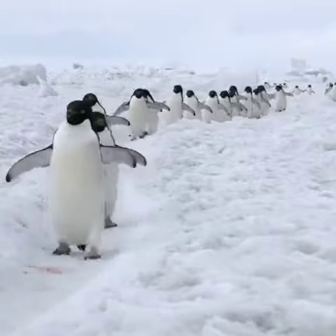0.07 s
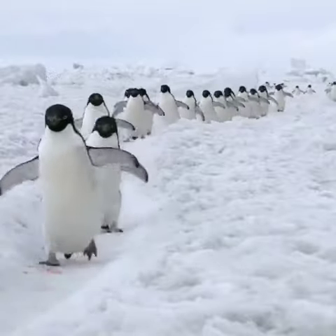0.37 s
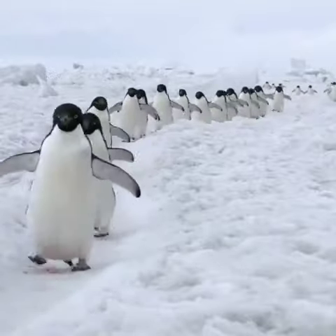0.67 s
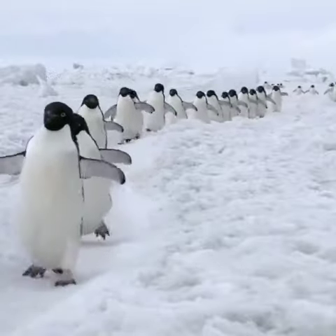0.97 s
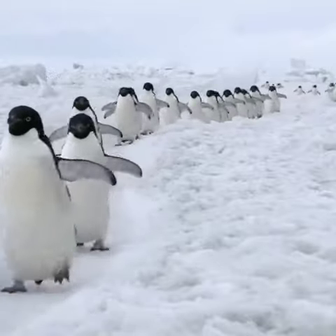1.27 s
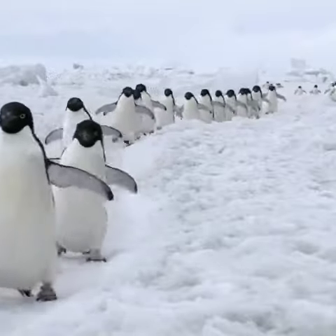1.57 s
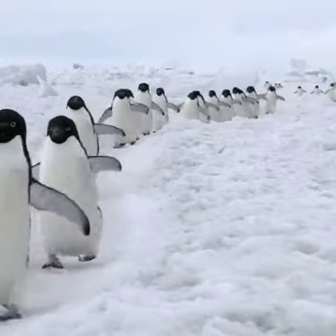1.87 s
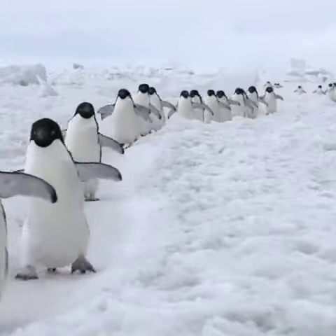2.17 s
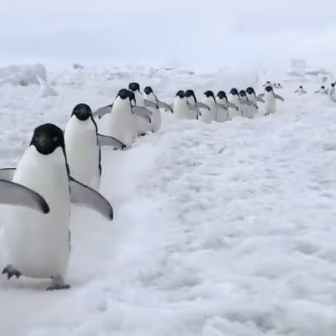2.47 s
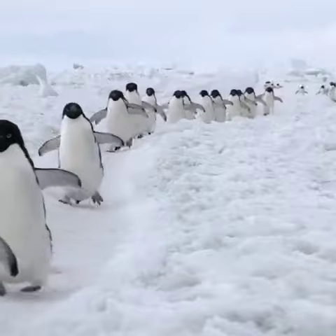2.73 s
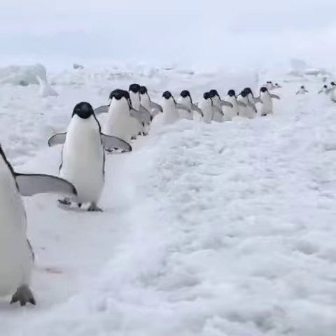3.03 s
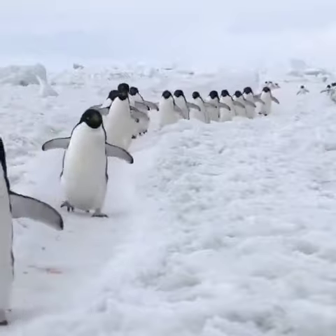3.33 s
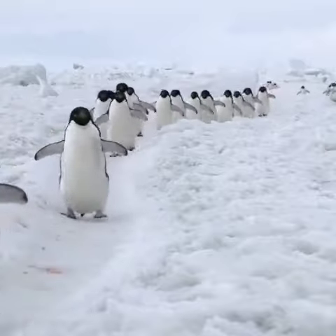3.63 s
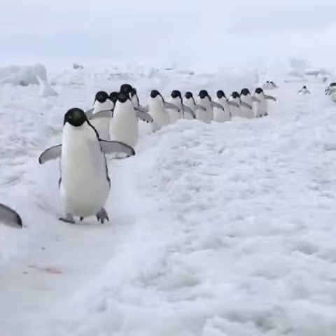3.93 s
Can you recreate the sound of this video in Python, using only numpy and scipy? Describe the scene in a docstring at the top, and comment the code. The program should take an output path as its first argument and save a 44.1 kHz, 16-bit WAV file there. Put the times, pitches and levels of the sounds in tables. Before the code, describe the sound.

One brief, raspy penguin squawk sounds early on, outdoors, over the faint crunching and shuffling of penguins walking on snow. The steps carry on as a gust of wind rumbles against the microphone with dull thumps and dies down.

```python
"""Penguins waddle over crusted snow in light wind. From the start their feet crunch and snap the
crust by brittle fracture, while more feet shuffle further back. At 0.6 s one bird gives a short
harsh squawk, pulses from its syrinx filtered by throat and bill, which arches in pitch and ends in
a rattle. The steps go on, and from 2.4 s the wind's turbulence swells to a rumble that buffets the
microphone with dull thumps, peaks near 3 s and eases."""
import sys
import numpy as np
from scipy import signal
from scipy.fft import rfft, irfft
from scipy.io import wavfile

SR = 44100
rng = np.random.default_rng(int(sys.argv[2]) if len(sys.argv) > 2 else 0)


def bounce(signal):
    """Save signal as a 16-bit WAV file at the path given by the first command-line argument."""
    frames = np.transpose(np.atleast_2d(signal))
    limited = np.clip(frames, -1, 1)
    pcm = np.round(limited * 32767).astype(np.int16)
    wavfile.write(sys.argv[1], SR, pcm)


N = 176400


# course of the call: t/s, pitch f/Hz, source level/dB, roughness (0 to 1)
CALL = [(.621, 165.6, -38, 0.35), (.632, 174, -34, 0.3), (.646, 186.4, -29, 0.15),
        (.664, 199.5, -26.5, 0.03), (.699, 206, -27.5, 0.03), (.711, 205, -28.5, 0.22),
        (.725, 200.4, -28.5, 0.3), (.742, 172, -29.5, 0.24), (.762, 174.4, -30, 0.28),
        (.777, 130.7, -32.5, 0.35), (.786, 124.4, -47, 0.35)]

def squawk():
    """Source-filter principle: pulses and rasping breath from the syrinx excite the bill and throat."""
    t = np.arange(CALL[0][0], CALL[-1][0], 1 / SR)
    hz, db, roughness = curve(CALL, t)
    cycles = np.cumsum(hz) / SR
    source = (syrinx(t, cycles, roughness) + rasp(cycles, roughness)) * amp(db)
    call = np.zeros(N)
    add(call, t[0], bill(source, hz))
    return throat(call)


def syrinx(t, cycles, roughness):
    """Self-sustained oscillation: both sides snap once a cycle; jitter and shimmer make it rough."""
    jitter_s, shimmer_db = 0.00027, 6.5  # at full roughness
    second_jitter_s, second_shimmer_db = 0.00028, 18.5  # likewise
    second_lead_s, second_db = 0.001236, -6.5  # the second side is early and weaker
    onsets = np.flatnonzero(np.diff(np.floor(cycles)))
    pulses = np.zeros(len(t))
    for i, (late, size, lead, second_size) in zip(onsets, rng.standard_normal((64, 4))):
        rough = roughness[i]
        at = t[i] + jitter_s * rough * late
        early = at - second_lead_s - second_jitter_s * rough * lead
        pulses += amp(shimmer_db * rough * size) * np.sinc((t - at) * SR)
        pulses += amp(second_db + second_shimmer_db * rough * second_size) * np.sinc((t - early) * SR)
    return unit(pulses)


def rasp(cycles, roughness):
    """Modulated flow noise: one decaying puff of breath a cycle, stronger when the voice is rough."""
    puffs = unit(np.exp(-(cycles % 1) / .5) * rng.standard_normal(N)[:len(cycles)])
    breath = colour(puffs, [(200, -14), (700, 0), (2000, 0), (6000, -3)])
    return breath * amp(-7) * (.05 + roughness)


# resonances of the open bill: f/Hz, bandwidth/Hz, gain/dB
BILL_FORMANTS = [(620, 240, 3), (1376, 51, -2)]
# nasal resonances at full strength: f/Hz, bandwidth/Hz, gain/dB
NASAL_FORMANTS = [(1245, 54, 6), (2080, 210, -8)]

def bill(source, hz):
    """Cavity resonance: formants rise as the bill opens with pitch; nasal ones emerge as it closes."""
    open_hz, full_nasal_closure = 199, 0.049
    opening = (hz / open_hz) ** 0.9
    closing = np.clip((1 - opening) / full_nasal_closure, 0, 1)
    oral = sum(amp(db) * resonate(source, f * opening, width) for f, width, db in BILL_FORMANTS)
    nasal = sum(amp(db) * resonate(source * closing, np.full(len(hz), f), width)
                for f, width, db in NASAL_FORMANTS)
    return source + oral + nasal


# band in which the throat answers late: f/Hz, bandwidth/Hz
THROAT_LAG = [(1200, 2700)]
# steady response of throat and bill: f/Hz, relative gain/dB
THROAT_RESPONSE = [(60, -53), (130, 1.5), (195, 5.5), (290, 1.5), (410, -3), (590, -1), (800, -4.5),
                   (1130, 1.5), (1370, -0.5), (1600, -13.5), (2050, 3.5), (2400, -11), (2800, -1),
                   (3600, -16.5), (4000, -10), (4850, -12), (5600, -21.5), (6500, -20.5), (8500, -32.5),
                   (12000, -27), (13500, -45)]

def throat(x):
    """Group delay and formants: an all-pass stage smears each pulse, then steady peaks colour it."""
    for centre, width in THROAT_LAG:
        r = np.exp(-np.pi * width / SR)
        poles = [1, -2 * r * np.cos(2 * np.pi * centre / SR), r * r]
        x = signal.lfilter(poles[::-1], poles, x)
    return colour(x, THROAT_RESPONSE)


# paths off the snow and nearby birds: delay t/s, gain/dB
REFLECTIONS = [(.00215, -21), (.0033, -23), (.0047, -23), (.0074, -8.5)]

def echoed(x):
    """Early reflection: delayed copies with little bass add to the direct sound."""
    bright = signal.sosfilt(signal.butter(1, 1500, "high", fs=SR, output="sos"), x)
    out = x.copy()
    for delay, db in REFLECTIONS:
        add(out, delay, amp(db) * bright)
    return out


# spectra of snow packing down and of fine powder: f/Hz, relative level/dB
PACKING_SPECTRUM = [(100, -4.5), (300, 2), (450, -5.5), (650, -3.5), (900, -5.5), (1300, -8), (2500, -7.5),
                    (6000, -58)]
POWDER_SPECTRUM = [(1500, -65), (4000, -10.5), (6000, 9), (9000, 9), (12300, 10.5), (13500, -18.5)]
# footfalls: t/s, duration/s, level/dB, crunch f/Hz, relative packing level/dB, relative powder level/dB
FOOTFALLS = [(0.015, 0.07, -42.5, 3000, -10.5, -12), (0.088, 0.016, -41.5, 3760, -3, -6),
             (0.114, 0.015, -44.5, 2640, -23, -4), (0.146, 0.076, -49, 3340, -7.5, -32),
             (0.222, 0.06, -47, 2770, -11, -28), (0.258, 0.012, -42.5, 3200, -9, -14),
             (0.352, 0.033, -52, 3100, -1, -4), (0.414, 0.12, -48, 4100, -6, -20),
             (0.534, 0.033, -44.5, 3580, -8.5, -13), (0.842, 0.041, -47.5, 3400, -7, -15),
             (0.965, 0.065, -46.5, 4060, -6, -5.5), (0.986, 0.0086, -39, 4430, -32, -21),
             (1.039, 0.039, -47, 3220, -4.5, -11), (1.228, 0.051, -47, 2940, -6.5, -17),
             (1.352, 0.043, -50, 3550, -5, -10), (1.451, 0.096, -47.5, 3130, -8, -17),
             (1.55, 0.042, -44.5, 3540, -8.5, -8), (1.616, 0.074, -50.5, 2870, -3.5, -6),
             (1.81, 0.12, -49, 3480, -10.5, -7), (1.961, 0.14, -47, 3130, -27, -7),
             (2.021, 0.024, -45, 2850, 3.5, -8), (2.268, 0.064, -50, 3100, -14, -11),
             (2.336, 0.1, -52, 2920, -6, -4), (2.551, 0.017, -45.5, 3000, 0.5, -26),
             (2.561, 0.069, -51, 3300, -9, -2.5), (2.654, 0.046, -47, 2890, -14, -13),
             (2.852, 0.042, -53, 3280, -8, 1), (3.08, 0.029, -50.5, 3100, 0, -2.5),
             (3.103, 0.032, -43.5, 3000, -2.5, -7.5), (3.306, 0.1, -53, 4500, -9, -17),
             (3.59, 0.025, -46.5, 4330, -16, -4), (3.613, 0.048, -52.5, 3700, 3, -9),
             (3.823, 0.097, -53, 4000, 0, 0)]

def steps():
    """Granular fracture: each foot crushes brittle crust, with dull packing beneath and powder on top."""
    rise, fall = 0.22, 0.59  # shares of a step
    crunch, packing_level, powder_level = np.zeros((3, N))
    clumps = unit(amp(3.05 * drift(rate_hz=284)))
    fractures = clumps * grains(per_s=5000, spread_db=5)
    for start, length, db, hz, packing_db, powder_db in FOOTFALLS:
        progress = np.linspace(0, 1, round(length * SR))
        press = amp(db) * np.clip(np.minimum(progress / rise, (1 - progress) / fall), 0, 1)
        crushed = press * unit(np.roll(fractures, -round(start * SR))[:len(press)])
        add(crunch, start, crust(np.pad(crushed, (0, SR // 100)), hz))
        add(packing_level, start, press * amp(packing_db))
        add(powder_level, start, press * amp(powder_db))
    powder = [colour(powder_level * clumps * grains(per_s=14000, spread_db=6.5), POWDER_SPECTRUM)
              for _ in range(2)]
    packing = colour(packing_level * clumps * rng.standard_normal(N), PACKING_SPECTRUM)
    return crunch + packing + stereo(*powder)


# single breaks of the crust: t/s, relative level/dB, f/Hz, treble level/dB relative to the body
BREAKS = [(0.012, -36.5, 3100, -7), (0.0943, -42, 3400, -15), (0.1537, -39, 3620, -20),
          (0.2616, -36, 3180, -36), (.3985, -41, 2850, -24), (.4205, -40, 3430, -6.5),
          (.487, -37.5, 3870, -17), (.913, -41.5, 3520, -3.5), (1.054, -39, 3330, -14),
          (1.214, -39, 3050, -13), (1.264, -37.5, 4350, -9), (1.74, -39.5, 3800, -5.5),
          (1.8568, -36, 3500, -10), (1.9358, -42, 3480, -5), (1.9718, -32, 3520, -9),
          (2.0238, -41, 3000, -14), (2.105, -48, 3270, -27.5), (2.26, -45, 3800, -13),
          (2.334, -38.5, 3140, -24), (2.426, -41, 2930, -23), (2.4335, -39, 2710, -24),
          (2.5579, -38.5, 2980, -2.5), (2.6584, -35, 2800, -15), (2.9118, -41.5, 3580, -6),
          (2.9757, -38, 3300, -22), (3.1445, -35.5, 3100, -9), (3.349, -41.5, 4000, -1),
          (3.554, -46.5, 4600, 3), (3.585, -42, 3060, -10), (3.701, -48, 2490, -8), (3.749, -46, 4250, -9),
          (3.834, -44.5, 4000, 5), (3.8608, -45, 3770, -8), (3.96, -41, 3970, -10)]

def snaps():
    """Impulsive excitation: a piece of crust gives way in one crack, followed by a few crumbs."""
    t = np.arange(round(.01 * SR)) / SR
    crumbs_db, decay_s = -18.5, 0.0019
    body, treble = np.zeros((2, N))
    for start, db, hz, treble_db in BREAKS:
        crumbs = amp(crumbs_db) * rng.standard_normal((2, len(t))) * np.exp(-t / decay_s)
        body_hit, treble_hit = (t == 0) + crumbs
        gain = amp(db - 8)
        add(body, start, gain * unit(crust(body_hit, hz)))
        add(treble, start, gain * amp(treble_db) * unit(treble_hit))
    return body + colour(treble, POWDER_SPECTRUM)


# spectrum of crust breaking at the reference pitch: f/Hz, relative level/dB
CRUST_SPECTRUM = [(300, -13), (1200, -10), (2100, -8), (2900, 2.5), (3300, 3), (4200, -3), (5500, -10.5),
                  (8000, -22), (13500, -14)]

def crust(x, hz, reference_hz=3100):
    """Frequency scaling: smaller pieces of crust sound the same spectrum at a higher pitch."""
    return colour(x, [(f * hz / reference_hz, db) for f, db in CRUST_SPECTRUM])


# spectra of the wind's low rumble and upper flutter: f/Hz, relative level/dB
RUMBLE_SPECTRUM = [(18, -26), (30, -39), (55, -9), (90, 0), (125, 2), (170, -4), (250, -20.5), (420, -30),
                   (900, -61.5)]
FLUTTER_SPECTRUM = [(60, -22), (130, -1), (190, 0), (260, -7), (380, -19.5), (600, -27.5), (1500, -45.5)]
# their envelopes: t/s, relative level/dB
RUMBLE_ENVELOPE = [(0, -52), (.24, -38.5), (.36, -47), (.8, -43.5), (1.1, -48.5), (1.2, -44), (1.58, -43.5),
                   (1.69, -54.5), (1.82, -62), (1.88, -43), (2.1, -49), (2.22, -47), (2.48, -36.5),
                   (2.7, -38), (2.94, -40), (3.0, -29.5), (3.06, -37.5), (3.12, -30.5), (3.2, -39),
                   (3.42, -39.5), (3.62, -45.5), (3.73, -49), (3.77, -39), (3.86, -47.5), (4, -45.5)]
FLUTTER_ENVELOPE = [(0, -36.5), (.24, -45.5), (.55, -52.5), (1.3, -66), (1.8, -89), (2.2, -60.5),
                    (2.5, -52), (2.93, -48), (2.99, -45), (3.06, -39.5), (3.12, -40.5), (3.22, -48),
                    (3.55, -55), (4, -89)]

def wind():
    """Turbulence: lumpy pressure fluctuations on the microphone make two bands of low noise."""
    t = np.arange(N) / SR
    rumble = colour(rng.standard_normal(N), RUMBLE_SPECTRUM) * amp(curve(RUMBLE_ENVELOPE, t)[0] - 2.5)
    flutter = colour(rng.standard_normal(N), FLUTTER_SPECTRUM) * amp(curve(FLUTTER_ENVELOPE, t)[0] + 1.5)
    eddies = unit(amp(1.8 * drift(rate_hz=27)))
    return (rumble + flutter) * eddies


# spectrum of a puff of air: f/Hz, relative level/dB
PUFF_SPECTRUM = [(100, -15.5), (250, 10.5), (420, 3), (700, -11.5), (2000, -52), (6000, -42)]
# buffets of wind: t/s, f/Hz, peak level/dB of the tone's envelope
BUFFETS = [(0.457, 137, -26.5), (0.917, 113, -30), (2.467, 95.5, -29), (2.515, 111, -34), (2.544, 98, -30),
           (2.775, 115, -31.5), (2.973, 123, -26), (3.082, 100, -29.5), (3.112, 112, -28.5)]

def thumps():
    """Heavily damped oscillation: each buffet is a dull push of two or three cycles with a puff of air."""
    rise_s, puff_db = 0.0069, -15
    t = np.arange(SR // 10) / SR
    swell = t / rise_s * np.exp(1 - t / rise_s)
    out = np.zeros(N)
    for start, hz, db in BUFFETS:
        puff = amp(puff_db) * unit(colour(rng.standard_normal(len(t)), PUFF_SPECTRUM))
        push = swell ** 2 * np.sin(2 * np.pi * hz * t)
        add(out, start, amp(db) * (swell * puff - push))
    return out


# envelope of the distant shuffling: t/s, relative level/dB
SHUFFLE_ENVELOPE = [(0, 3), (.55, 5.5), (1, 2), (1.85, -0.5), (1.92, -13), (2, 7.5), (2.5, -7.5), (2.58, 2),
                    (3.13, 2), (3.162, -3), (3.19, 2), (3.53, 5), (3.57, -7), (3.61, 5.5), (3.67, 4),
                    (3.73, -6.5), (3.76, 4), (4, 2.5)]

def procession():
    """Incoherent summation: the fractures under many distant feet merge into an uneven shuffle."""
    level = amp(curve(SHUFFLE_ENVELOPE, np.arange(N) / SR)[0])
    bustle = level * unit(amp(3.2 * drift(rate_hz=50) + 2.2 * drift(rate_hz=144)))
    crunch = np.zeros(N)
    for hz in (2600, 3400, 4400):
        clumps = unit(amp(2.5 * drift(rate_hz=66)))
        crunch += crust(clumps * grains(per_s=1500, spread_db=2.5), hz)
    powder = [colour(bustle * grains(per_s=5400, spread_db=4), POWDER_SPECTRUM) for _ in range(2)]
    return amp(-57.5) * bustle * unit(crunch) + amp(-61.5) * stereo(*powder)


# spectrum of the background air: f/Hz, relative level/dB
AIR_SPECTRUM = [(200, 7.5), (400, 5), (1000, 3.5), (1800, 2), (3500, -6), (7000, -12), (12300, -20),
                (13500, -26)]

def air():
    """Amplitude-modulated noise: a soft hiss of air whose level flickers."""
    hiss = rng.standard_normal(N) * amp(1.9 * drift(rate_hz=130))
    return amp(-58) * colour(hiss, AIR_SPECTRUM)


def grains(per_s, spread_db):
    """Poisson process: tiny fractures at random times, a few much larger than the rest."""
    size = amp(spread_db * np.minimum(rng.exponential(1, N), 4))
    return unit(size * rng.choice([-1, 1], N) * (rng.random(N) < per_s / SR))


def drift(rate_hz):
    """Band-limited noise: a random wander of rms 1."""
    hz = np.fft.rfftfreq(N, 1 / SR)
    band = (hz > 2) * np.exp(-(hz / rate_hz) ** 2)
    return unit(irfft(rfft(rng.standard_normal(N)) * band, N))


def colour(x, spectrum, size=4096):
    """Minimum-phase filtering: a causal response of unit energy with the given spectrum."""
    hz, db = np.transpose(spectrum)
    log_hz = np.log(abs(np.fft.fftfreq(size, 1 / SR)) + 1)
    log_gain = np.log(amp(np.interp(log_hz, np.log(hz), db)))
    response = np.exp(np.conj(signal.hilbert(log_gain)))
    taps = np.fft.ifft(response).real[:size // 2]
    return signal.fftconvolve(x, taps / np.linalg.norm(taps))[:len(x)]


def resonate(x, hz, width):
    """Driven resonance: a peak of gain 1 follows the curve hz."""
    phasor = np.exp(2j * np.pi * np.cumsum(hz) / SR)
    r = np.exp(-np.pi * width / SR)
    return 2 * (phasor * signal.lfilter([1 - r], [1, -r], x / phasor)).real


def stereo(middle, side, width=.5):
    """Sum and difference: two channels from a common sound and a weaker side signal."""
    return np.array([middle + width * side, middle - width * side])


def curve(table, t):
    """Linear interpolation: every column of a time table at the times t."""
    times, *columns = np.transpose(table)
    return [np.interp(t, times, column) for column in columns]


def add(mix, start, sound):
    """Superposition: a sound joins the mix at start/s."""
    part = mix[max(round(start * SR), 0):][:len(sound)]
    part += sound[:len(part)]


def amp(db):
    """Decibel law: level to amplitude ratio."""
    return 10 ** (np.asarray(db) / 20)


def unit(x):
    """Normalisation to rms 1."""
    return x / np.sqrt(np.mean(x ** 2) + 1e-20)


def scene():
    """Superposition: the call, the feet and the moving air add linearly."""
    return echoed(squawk()) + steps() + snaps() + procession() + air() + wind() + thumps()


def record(dry, cutoff_hz=13350):
    """Band limiting: a steep linear-phase low-pass removes the highest treble."""
    taps = signal.firwin(401, cutoff_hz, window=("kaiser", 9), fs=SR)
    return signal.oaconvolve(dry, taps[None], "same")


dry = scene()
out = record(dry)
bounce(out)
```